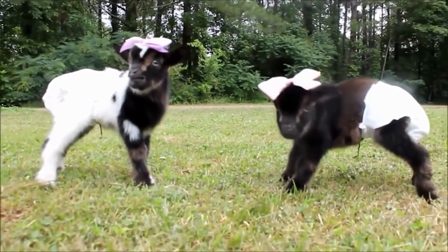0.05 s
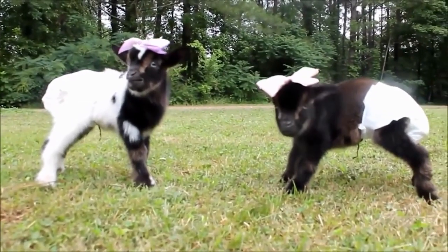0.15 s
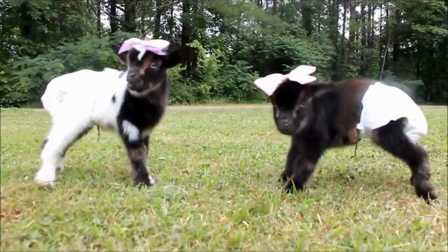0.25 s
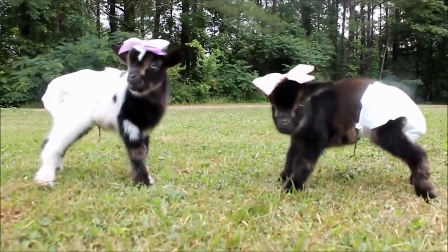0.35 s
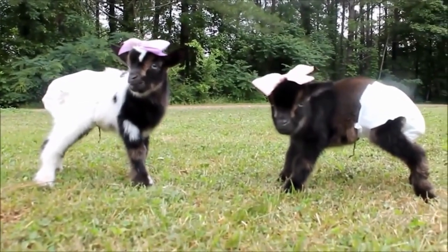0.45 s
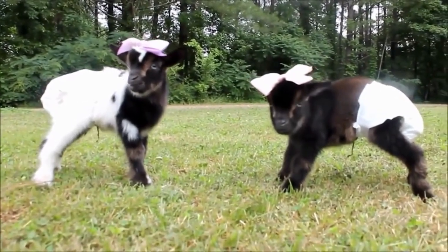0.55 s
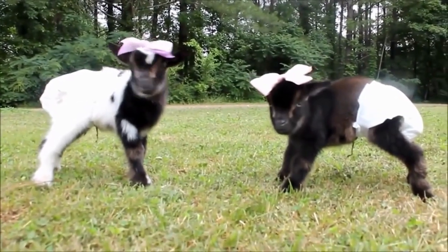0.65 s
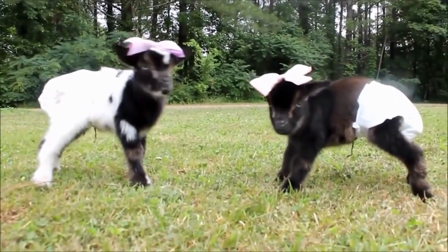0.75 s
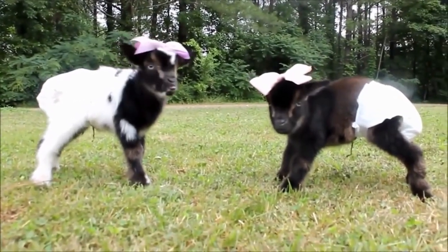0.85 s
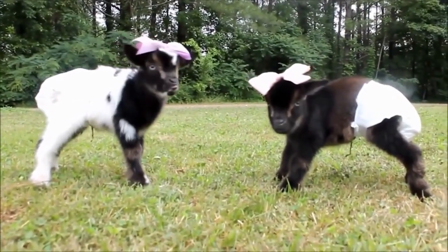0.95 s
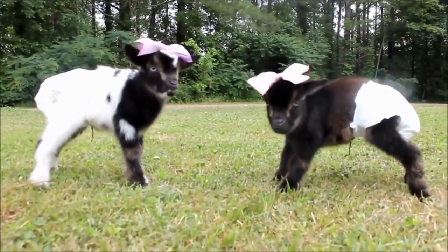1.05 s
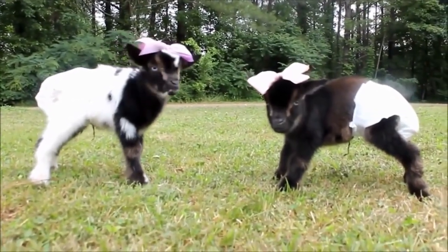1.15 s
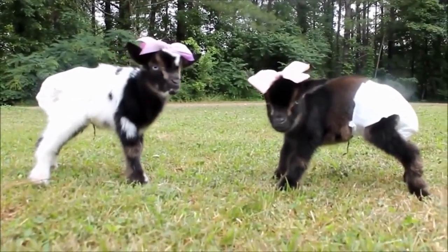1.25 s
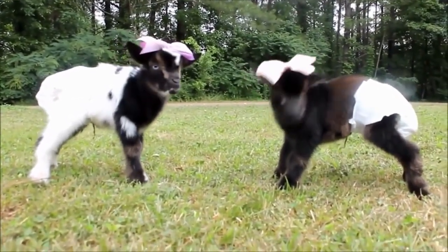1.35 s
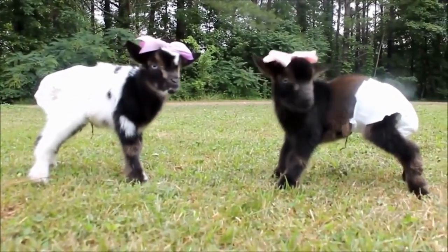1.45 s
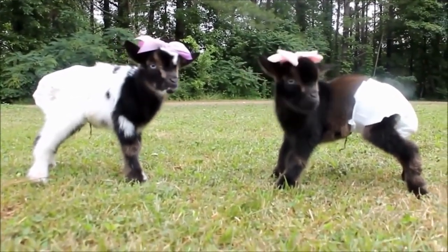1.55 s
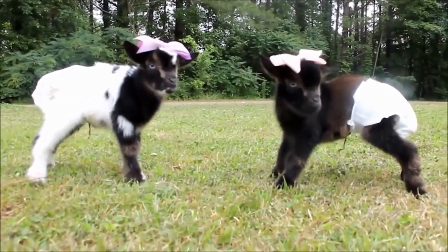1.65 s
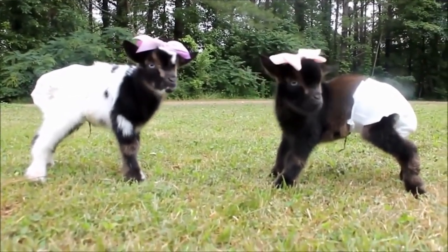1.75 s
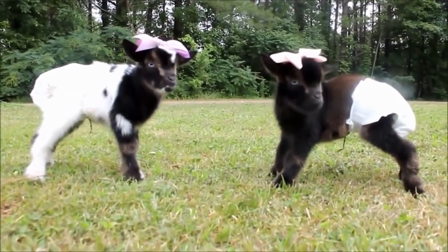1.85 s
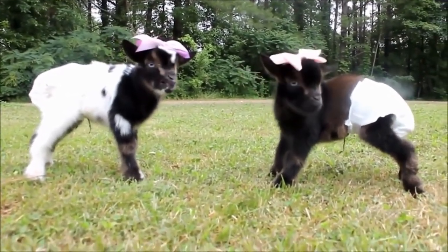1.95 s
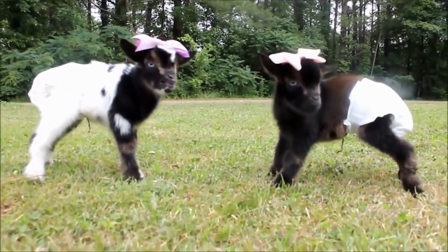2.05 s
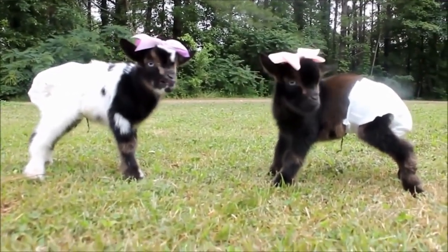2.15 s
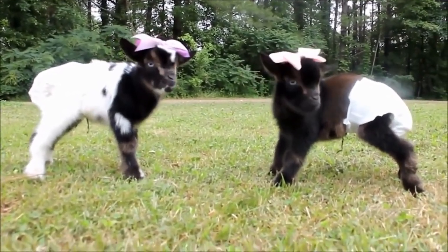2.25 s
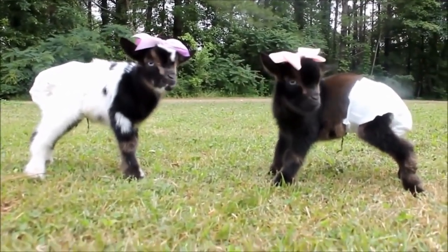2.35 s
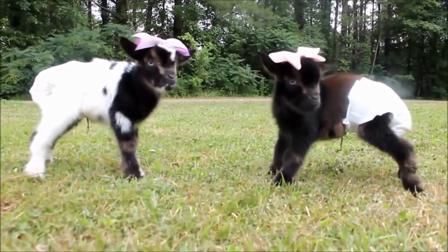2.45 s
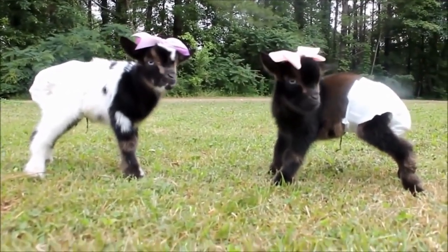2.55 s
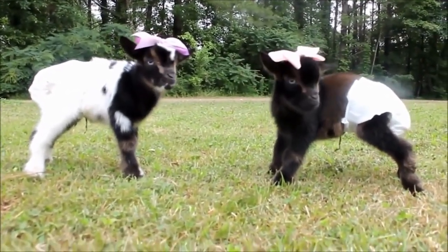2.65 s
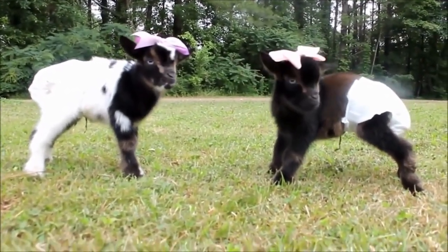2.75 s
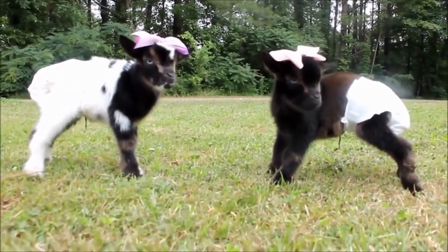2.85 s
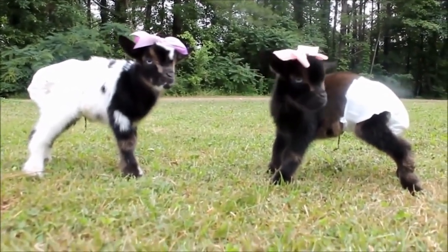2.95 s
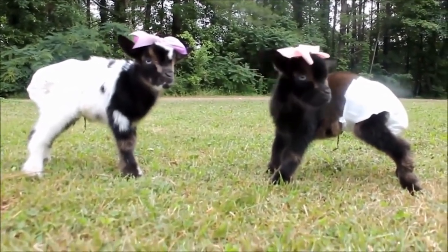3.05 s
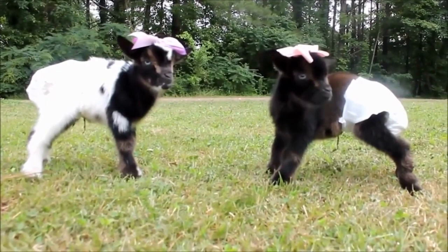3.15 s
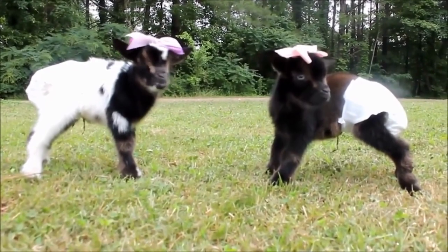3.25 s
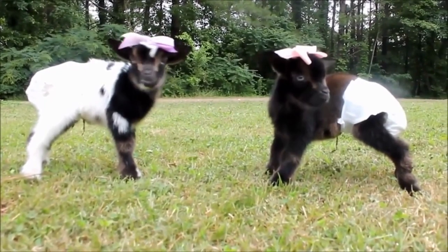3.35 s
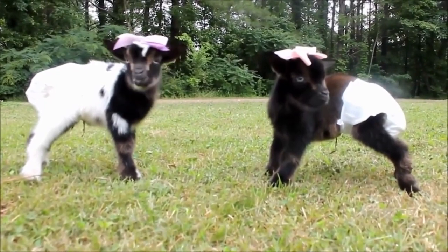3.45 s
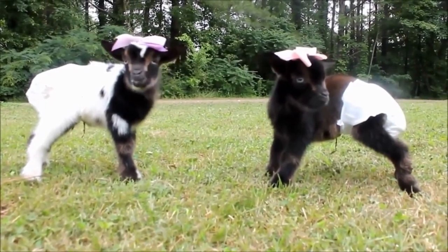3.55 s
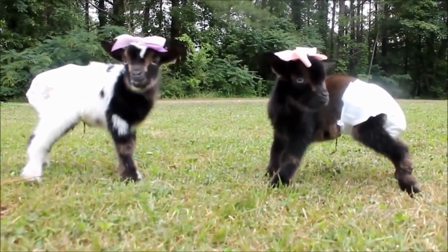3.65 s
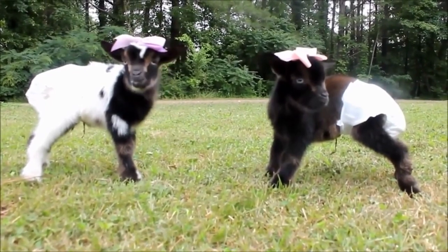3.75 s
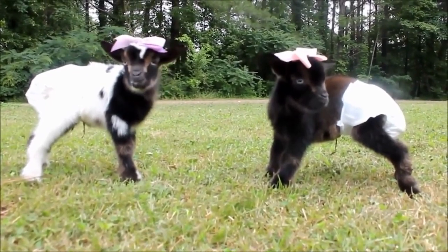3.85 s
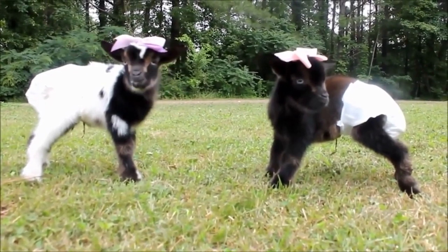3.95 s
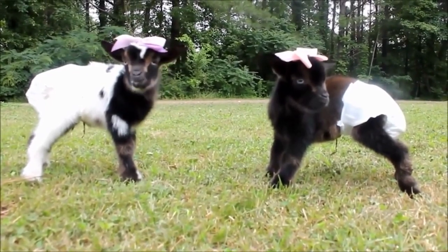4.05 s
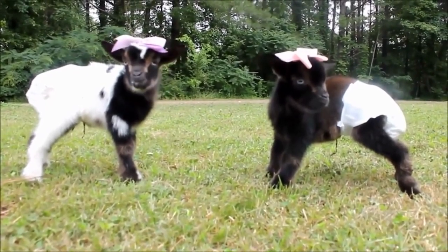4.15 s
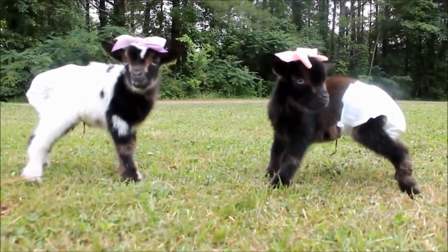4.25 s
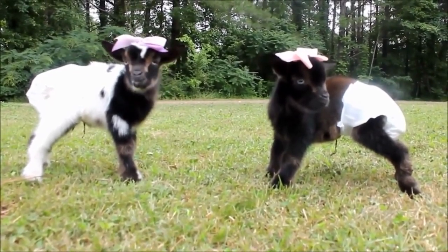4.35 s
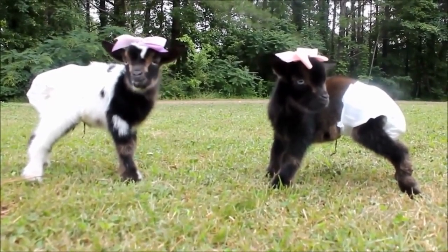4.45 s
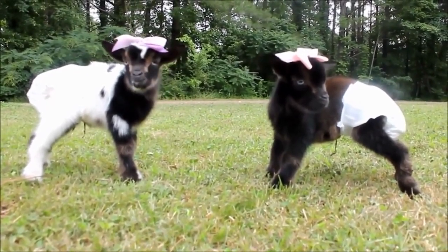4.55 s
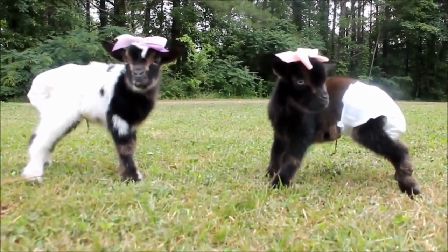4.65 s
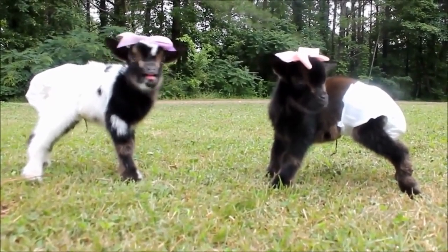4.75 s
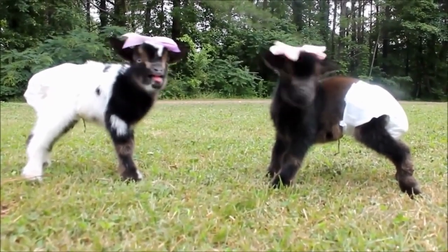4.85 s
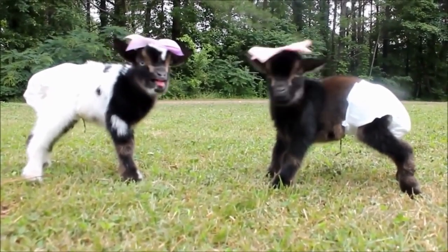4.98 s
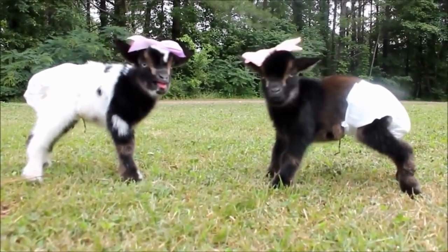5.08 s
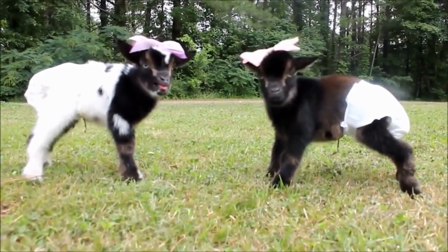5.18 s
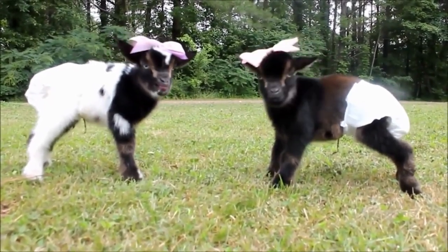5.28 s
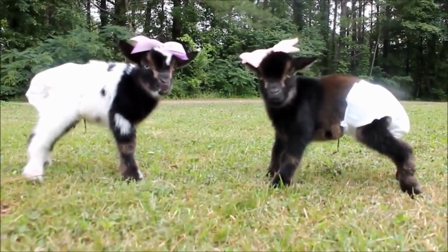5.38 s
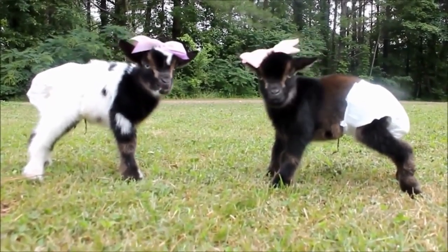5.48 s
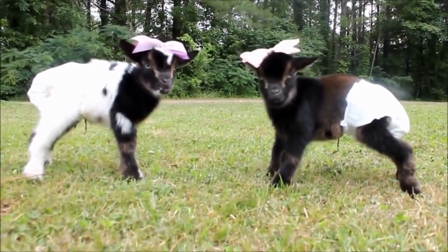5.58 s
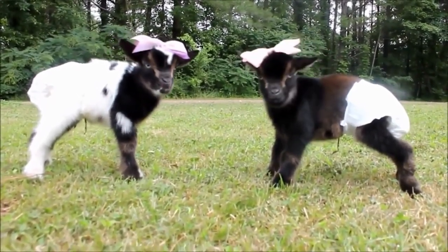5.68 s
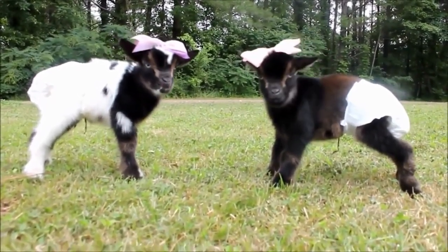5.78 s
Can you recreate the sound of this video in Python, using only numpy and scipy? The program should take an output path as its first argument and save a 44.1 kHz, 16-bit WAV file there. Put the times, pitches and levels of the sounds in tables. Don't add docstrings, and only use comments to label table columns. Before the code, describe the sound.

A goat kid near the microphone opens with a thin whimper and a short high bleat. After a quiet gap it mutters in closed-mouth throbs that burst into a second bleat. Faint birds twitter and grass ticks during a longer pause, then a louder, quavering cry of over half a second ends in a thin rising whine. Soft traffic hum and leaves continue on an open lawn edged by trees.

```python
import sys
import numpy as np
from scipy import signal
from scipy.fft import rfft, irfft, next_fast_len
from scipy.io import wavfile
from scipy.ndimage import uniform_filter1d

SR = 44100
rng = np.random.default_rng(int(sys.argv[2]) if len(sys.argv) > 2 else 0)


def to_linear_factor(level_db):
    exponent = np.asarray(level_db, float) / 20
    return 10 ** exponent


def transcribe(signal):
    frames = np.atleast_2d(signal).T
    limited = np.clip(frames, -1, 1)
    pcm = np.round(limited * 32767).astype(np.int16)
    wavfile.write(sys.argv[1], SR, pcm)


N = 256651

# [f/Hz, level/dB]
AIR = [(24, -63.5), (40, -42), (70, -20), (113, -5), (156, -9), (216, 0), (285, -4.5), (385, -13.5),
       (520, -8), (864, -8.5), (1110, -11.5), (1730, -14), (10000, -38.5), (13000, -61), (22000, -120)]
# [t/s, hum and leaves level/dB]
BREEZE = [
    (0, -58.5),
    (.6, -59.5),
    (1.4, -58),
    (2.4, -57.5),
    (3.001, -58.5),
    (3.5, -56.5),
    (4.7, -56.5),
    (5.4, -53.5),
    (5.82, -57),
]
CALM_DB = -58
RUSTLE_DB, RUSTLE_PER_DB = 3.5, -.5
TRAFFIC_DB, TRAFFIC_PER_DB = -0.22, -1.1

# [t/s, effort level/dB, pitch f/Hz, mouth opening 0-1]
WHIMPERS = [
    [(0, -63.5, 880, 0.81), (.034, -66.5, 903, 0.4), (.054, -67.5, 935, 0.64), (.08, -72, 928, 0.3),
     (.097, -62, 880, 0.4)],
    [(1.962, -59, 909, 0.13), (1.982, -55.5, 801, 0.12), (1.997, -49, 775.5, 0.48),
     (2.017, -49.5, 830, 0.46), (2.062, -64, 838, 0.2)],
]
FIRST = [
    (.094, -52.5, 877.2, 0),
    (.116, -43, 840, 0.44),
    (.131, -35.5, 853, 0.83),
    (.152, -39.5, 825, 0.85),
    (.19, -44, 821, 0.65),
    (.203, -33.5, 872, 0.85),
    (.24, -25.5, 840, 0.79),
    (.29, -37, 727, 0.86),
    (.312, -49, 880, 0.5),
]
SECOND = [
    (2.059, -51.5, 853, 0.16),
    (2.077, -36, 878, 1),
    (2.092, -29.5, 880, 0.99),
    (2.122, -32, 847.3, 0.85),
    (2.19, -30, 892, 0.93),
    (2.234, -29.5, 845, 0.924),
    (2.252, -34.5, 810, 0.68),
    (2.28, -43.5, 773, 0.66),
    (2.31, -43, 724, 0.77),
]
LONG = [
    (4.791, -53, 813, 0.31),
    (4.806, -28, 843.5, 0.77),
    (4.875, -33.5, 936, 0.93),
    (5.035, -34, 973, 0.57),
    (5.19, -26.5, 870.6, 0.61),
    (5.31, -23, 846.6, 0.658),
    (5.355, -27.5, 837.4, 0.72),
    (5.406, -27.5, 755, 0.813),
    (5.427, -63, 847, 1),
]
# [peak t/s, effort level/dB, pitch f/Hz, length ratio, share of the glide]
MUTTER = [
    (1.535, -42.5, 625, 0.9, 0.31),
    (1.621, -34, 660, 0.9, 0.94),
    (1.72, -36, 655, 1.01, .9),
    (1.818, -38, 660, 1, 1),
]
# [t/s from its peak, effort level/dB, pitch ratio]
THROB = [
    (-.043, -24.5, 0.83),
    (-.029, -14, 1.11),
    (-.02, -10.5, 1.09),
    (0, -2, 1),
    (0.013, -9.5, .98),
    (0.024, -14, .94),
    (.036, -17.5, .83),
]
# [t/s, effort level/dB, pitch f/Hz, mouth opening 0-1]
DRAWL = [
    (1.863, -55, 658, 0.133),
    (1.885, -54, 656, 0.12),
    (1.905, -59, 688, 0.1),
    (1.931, -51, 743, 0.068),
    (1.971, -53.5, 697, 0.094),
]
MUTTER_MOUTH = 0.17

# [level/dB, dB per dB of effort, dB per s of calling, dB per 100 Hz above mean pitch]
COLOUR_WHIMPERS = [
    [(3.5, -0.35, 20, -9), (1, -0.16, 62.5, 7), (-32.5, -0.54, -90, -4.5)],
    [(9, 0.079, 19.5, -5.5), (-7.5, -0.062, 152, -6.5), (-32.5, -.6, -18, -5)],
]
COLOUR_FIRST = [
    (4.5, 0.2, -73, 5),
    (0.5, 0.3542, -25, 2.5),
    (-41.5, 0.5, 88.5, 6),
]
COLOUR_MUTTER = [
    (-2.5, 0.22, 6.5, -2.2),
    (-11.5, -0.18, -15.5, 1.9),
    (-27.5, -0.45, -17, -2),
]
COLOUR_SECOND = [
    (-0.5, 0.32, -43.5, 10.7),
    (-2, 0.34, -15, 3.53),
    (-33.5, -0.13, 12.5, 1),
]
COLOUR_LONG = [
    (-2, 0.51, -34.5, 0.42),
    (3, -0.17, -1.5, 7.5),
    (-21, -.2, -11, 3.84),
]
MID_EFFORT_DB = -35
# [chest level/dB, brightness level/dB, sheen level/dB]
OPENING_DB = (-8, 0.5, -0.5)
EDGES_HZ = (1900, 4200, 10200, 13000)
TOP_FADE_START_S, TOP_FADE_DB_PER_S = 0.34, 95

# [t/s, fall t/s, recovery t/s, pitch drop f/Hz (negative lifts),
# effort change level/dB]
QUAVER = [(0.119, 0.0093, 0.012, 31.5, 3.5), (0.165, 0.0063, 0.011, 59.5, -1), (0.22, 0.006, 0.005, 2.1, 3),
          (0.227, 0.0059, 0.023, 52.5, 0.5), (0.301, .006, .006, 13, -3), (2.097, 0.00644, 0.02, 48.5, 1.5),
          (2.158, 0.019, 0.018, 61, -9), (2.209, 0.016, 0.016, 54.5, 5), (2.293, 0.0063, 0.0086, 55, 2),
          (4.902, 0.012, 0.021, 70, 6), (4.978, 0.01, 0.028, 69, 7.5), (5.002, 0.0132, 0.015, 45.5, 2),
          (5.102, 0.05, 0.026, 51, 2), (5.172, 0.0041, 0.017, 24.5, 2), (5.203, 0.0083, 0.0048, 26, -1),
          (5.258, 0.041, 0.038, 72, -2.5), (5.331, 0.0058, 0.018, 37, 0), (5.379, 0.017, 0.019, 61, -1.5),
          (.182, 0.0064, 0.0057, 12, -1), (2.035, 0.0092, 0.00833, 19, -4.5),
          (2.127, 0.0081, .01, -17.5, -2), (4.884, 0.014, 0.00574, -13, 3),
          (5.007, 0.0035, 0.00357, -0.5, -2.5), (5.226, 0.0075, 0.011, -22.5, -1),
          (1.511, .01, 0.01, 1.5, -10), (1.549, .014, .012, -0.5, 4.5), (5.091, 0.0041, 0.0046, 16.5, 2),
          (5.241, 0.0058, .006, -10.5, 2.5), (5.4, 0.0051, 0.0053, -20, -1.5)]
# [t/s, half width t/s, added breathiness 0-1]
RASP = [(.04, .06, .08), (.2, .12, .045), (1.68, .25, .062), (2.17, .14, .03), (5.28, .16, .013),
        (.175, .018, .18), (.31, .017, .45), (1.51, .01, .5), (1.545, .022, .08), (1.577, .012, .5),
        (1.67, .016, .7), (1.772, .02, .7), (1.852, .014, .22), (1.89, .05, .08), (2.159, .008, .2),
        (2.305, .022, .26), (4.788, .008, .12), (5.148, .022, .055), (5.21, .006, .05), (5.262, .012, .045),
        (5.29, .011, .06), (5.385, .016, .07), (5.432, .014, .55)]
CLEAR_BREATH = .022
# [t/s, phase wander/rad at 8.5 kHz]
FRAY = [(0, 1.2), (.07, .8), (.1, .2), (.14, .1), (.175, .5), (.2, .12), (.26, .15), (.295, .7), (1.5, 1.5),
        (1.56, 1.2), (1.6, .3), (1.83, .3), (1.86, 4), (1.915, 3), (1.95, 1), (2.0, .25), (2.13, .12),
        (2.16, .5), (2.19, .1), (2.24, .2), (2.28, .8), (4.8, .05), (4.99, .05), (5.02, .16), (5.05, .05),
        (5.11, .1), (5.145, .28), (5.18, .2), (5.23, .3), (5.27, .45), (5.31, .22), (5.35, .28), (5.39, .5)]

# [f/Hz, width f/Hz, level/dB]
SHUT = [(653, 350, -0.5), (1250, 760, -18.5), (2090, 750, 3), (2870, 420, -17), (4850, 1620, -14.5),
        (6766, 1400, -15), (8750, 1010, -13.5), (11800, 1500, -24)]
OPEN = [(880, 38, -32), (1830, 570, -2.5), (2500, 460, 5), (3500, 1800, -9.5), (5146, 930, 14),
        (7280, 1100, -2), (8600, 1140, -7.5), (10670, 4700, -20.5)]
POCKET_HZ, POCKET_SLIDE_HZ = 4980, 1384
# [t/s, f/Hz, depth 0-1]
TONGUE = [(0, 5700, 0.55), (.11, 4200, 0.33), (.135, 5300, 1), (.17, 5400, 1), (.2, 4500, 0.8),
          (.225, 3250, 0.87), (.3, 3100, 0.34), (1.97, 4000, 0), (2.075, 3900, 0.8), (2.093, 4130, 1),
          (2.105, 4670, 1), (2.125, 5400, 0.4), (2.2, 3430, 0.6), (2.3, 4060, 0.8), (4.8, 5500, 1),
          (5.1, 6100, 0.03), (5.3, 3600, 0.45), (5.43, 4020, 0.7)]
# [t/s, nose f/Hz, nose level/dB, chest level/dB]
NOSE = [(.09, 3500, 9, -4.5), (.122, 3300, -12, 2.5), (.146, 3400, 10.5, 1), (.17, 3140, -9, -2),
        (.212, 3450, 10, -0.5), (.247, 3230, -11, 0), (.28, 3000, -1, -2.5), (.305, 3300, 2, 12),
        (1.5, 3300, -1, -1), (1.845, 2900, 0.5, -2), (1.88, 2900, -11, -9), (1.925, 3000, -3, 3),
        (1.96, 3330, 1.5, -1), (1.985, 3200, 13, 1.5), (2.03, 3370, -6.5, -1.5), (2.078, 3500, -18, -3.5),
        (2.102, 3350, 8, 3), (2.14, 3350, -4, -4.5), (2.195, 3400, 4, 0), (2.215, 3330, -2, -3),
        (2.265, 3150, 6, 1.5), (2.295, 2800, -1, 10), (4.8, 3400, 2.5, 4), (4.82, 3500, 5, 4),
        (4.901, 3500, -4, -4), (4.98, 3570, -4, -5), (5.098, 3500, -5, -0.5), (5.18, 3300, -9.5, 2),
        (5.26, 3190, -3, -4.5), (5.33, 3400, -7, 3), (5.385, 2950, -1, -4.5), (5.41, 3100, 4, 11)]
# [t/s, f/Hz, level/dB]
CHEEK = [(0, 5300, -14), (.03, 5600, -3), (.09, 6100, -11), (.15, 5900, -11), (.165, 5700, -2.5),
         (2.01, 5460, 3.5), (2.045, 5390, -8), (2.07, 6100, -5), (2.095, 4180, -2), (2.12, 4300, 1),
         (2.2, 5950, 0.5), (2.3, 5000, -2), (4.85, 9900, -5), (5.05, 9650, -8), (5.078, 6300, 2),
         (5.098, 6100, -19), (5.165, 6200, -7), (5.19, 6500, -10), (5.262, 6450, -10), (5.275, 4080, -14),
         (5.29, 4050, -5), (5.34, 4020, -7), (5.365, 6500, -6), (5.41, 3970, -3)]
# [t/s, f/Hz, lift level/dB]
PALATE = [(0, 4500, 7), (.03, 4580, -4.5), (.065, 8500, -8), (.105, 5100, 12), (.122, 7860, -5),
          (.14, 8700, 9), (.17, 8100, 5), (.205, 6900, 0), (.24, 7600, 0), (.27, 8600, 0), (1.53, 7200, 6),
          (1.6, 7440, 13), (1.63, 9500, -18), (1.7, 8710, -9), (1.81, 8650, -2), (1.94, 8860, -27),
          (2.0, 7520, 5), (2.08, 7130, 8), (2.105, 7400, 2.5), (2.16, 7300, 1.5), (2.19, 7000, 2),
          (2.215, 7660, 2), (2.26, 5970, -14), (4.8, 8350, -8), (4.9, 7200, -1), (5.0, 8450, -16),
          (5.1, 8370, 2), (5.169, 9300, -12), (5.3, 8700, -7.5), (5.4, 5620, -41)]
TONGUE_WIDTH_HZ, NOSE_WIDTH_HZ, CHEEK_WIDTH_HZ, PALATE_WIDTH_HZ = 3540, 800, 1500, 1370

# [t/s, length t/s, middle f/Hz, slide as share of pitch, level/dB]
SLIDES = [(.502, 0.044, 3660, -0.01, -68.5), (2.556, 0.087, 9100, -0.012, -74.5),
          (2.573, 0.032, 3040, .05, -68), (2.621, 0.033, 3730, -0.2, -59.5),
          (2.813, 0.0155, 3500, -0.069, -63.5), (2.966, 0.026, 4080, -0.034, -59.5),
          (2.989, 0.017, 7050, -0.0069, -63.5), (3.001, 0.028, 6350, -0.018, -59),
          (3.11, 0.035, 2670, -.14, -69), (3.045, 0.0143, 4640, .05, -69), (3.056, .015, 3355, -0.022, -64),
          (3.387, 0.037, 4390, -.03, -65), (3.533, .025, 5040, 0.036, -66), (4.36, 0.04, 5910, 0.018, -60),
          (3.432, 0.033, 3414, 0.036, -64), (3.455, 0.0223, 3870, 0.055, -63),
          (3.494, 0.11, 3100, -0.152, -67.5), (3.572, 0.11, 2500, -0.066, -65.5),
          (3.538, 0.031, 4620, -0.065, -64), (3.615, 0.037, 4580, -0.049, -63),
          (3.757, 0.0603, 2500, 0.04, -66.5), (4.431, 0.01, 7080, -0.11, -67),
          (4.439, 0.017, 6094, -.1, -55), (4.542, 0.011, 5700, -0.07, -64),
          (4.546, 0.053, 3418, -0.15, -62), (4.593, 0.032, 3300, .1, -62),
          (4.481, 0.015, 4600, 0.01, -58.5), (.33, 0.072, 3717, -0.037, -67.5), (.4, .11, 3710, 0.015, -78),
          (.29, 0.15, 7250, -0.011, -81), (3.24, 0.52, 4489, 0.012, -76), (3.8, 0.75, 2716, 0.017, -79)]
# [t/s, peak level/dB, length t/s]
GASPS = [
    (.307, -41, .036),
    (2.302, -45, .04),
    (5.416, -42.5, .04),
]
GASP_RINGS_HZ = (2650, 3600, 5400)
# [t/s, peak level/dB, ring f/Hz]
TICKS = [
    (1.1034, -35, 7400),
    (3.14, -35, 7920),
    (3.363, -40, 5920),
    (3.5684, -31, 5200),
    (3.6404, -32, 5000),
    (3.6474, -31.5, 5600),
    (3.7337, -36, 5200),
    (4.4466, -40, 7000),
]
# [t/s, length t/s, top f/Hz, level/dB]
ARCHES = [
    (2.665, .069, 8350, -72),
    (2.767, .066, 8050, -70.5),
    (2.878, .037, 7700, -70.5),
]
ARCH_DEPTH, ARCH_SQUARE = .33, 5
# [t/s, centre f/Hz, level/dB]
TRILL = [
    (3.201, 4530, -76),
    (3.26, 4470, -66),
    (3.45, 4215, -71.5),
    (3.65, 4500, -65),
    (3.85, 4450, -79),
]
TWITTER = [
    (4.681, 3500, -71),
    (4.699, 3500, -61),
    (4.734, 3600, -64),
    (4.791, 4000, -61),
]
# [t/s, centre f/Hz, level/dB]
AFTERGLOW = [
    (5.595, 2050, -74),
    (5.63, 1970, -59.5),
    (5.69, 1990, -74),
    (5.73, 2050, -74),
]
SMACK_S, SMACK_DB, SMACK_HZ, SMACK_FADE_S = 4.794, -50, 1050, .005
# [t/s, pitch f/Hz, level/dB]
WHINE = [
    (5.455, 1730, -61),
    (5.493, 1830, -54.5),
    (5.517, 1890, -57.5),
    (5.555, 1973, -48.5),
    (5.587, 2112, -52),
    (5.61, 2163, -87),
]
# [f/Hz, level/dB]
SELF_NOISE = [(20, -118), (60, -110), (150, -118), (7000, -116), (11500, -104), (16000, -103)]


def read(points, hz):
    f, value = np.transpose(points)
    return np.interp(np.log(hz + 1), np.log(f + 1), value)


def follow(t, rows):
    s, *columns = np.transpose(rows)
    return [np.interp(t, s, column) for column in columns]


def evened(x):
    return x / np.sqrt(np.mean(x ** 2) + 1e-20)


def wander(shape, size):
    return evened(uniform_filter1d(uniform_filter1d(rng.standard_normal(shape), size), size))


def bumps(t, s, rise, fall, *heights):
    lag = t - s[:, None]
    span = np.where(lag < 0, rise[:, None], fall[:, None])
    return np.array(heights) @ np.exp(-(lag / span) ** 2)


def whistle(hz):
    return np.sqrt(2) * np.sin(2 * np.pi * np.cumsum(hz) / SR)


def resonate(x, hz, width):
    turn = np.exp(2j * np.pi * np.cumsum(hz * np.ones(len(x))) / SR)
    r = np.exp(-np.pi * width / SR)
    return 2 * (turn * signal.lfilter([(1 - r) ** 2], [1, -2 * r, r * r], x / turn)).real


def shaped(db):
    a, b = rng.standard_normal((db.shape[1], db.shape[0], 2)).T
    return signal.istft((a + 1j * b) * to_linear_factor(db), nperseg=1024, noverlap=768)[1][:N]


def add(mix, s, sound):
    part = mix[round(s * SR):][:len(sound)]
    part += sound[:len(part)]


def background():
    frames, hz = N // 256 + 5, np.fft.rfftfreq(1024, 1 / SR)
    patches = rng.standard_normal((frames, 513)).T
    patches = uniform_filter1d(uniform_filter1d(patches, size=10, axis=0), size=14, axis=1)
    patch_db = (1.1 + .6 * np.clip(hz / 2000, 0, 1))[:, None] * evened(patches)
    level_db, = follow(np.arange(frames) * 256 / SR, BREEZE)
    rustle_db = RUSTLE_DB + RUSTLE_PER_DB * (level_db - CALM_DB)
    traffic_db = TRAFFIC_DB + TRAFFIC_PER_DB * (level_db - CALM_DB)
    treble = np.clip(np.log2(hz / 1500 + 1e-9), 0, 1) / (1 + (hz / 8200) ** 6)
    lift_db = np.outer(treble, rustle_db) + np.outer(hz < 320, traffic_db)
    wash = evened(shaped(read(AIR, hz)[:, None] + patch_db + lift_db))
    return wash * to_linear_factor(np.interp(np.arange(N) / 256, np.arange(frames), level_db))


def controls(t, rows, colour):
    glide = round(.009 * SR)
    effort_db, hz, mouth = (uniform_filter1d(c, glide, mode="nearest") for c in follow(t, rows))
    drop_hz, lift_db = bumps(t, *np.transpose(QUAVER))
    effort_db, hz = effort_db + lift_db, hz - drop_hz
    mouth = np.clip(mouth, 0, 1)
    causes = np.array([1 + 0 * t, effort_db - MID_EFFORT_DB, t - t[0], (hz - hz.mean()) / 100])
    colour_db = np.array(colour) @ causes + np.outer(OPENING_DB, mouth - .5)
    return effort_db, hz, mouth, *colour_db


def vocal_folds(t, hz, turns, breath, flutter_db):
    k = np.arange(1, 24)[:, None]
    flutter = to_linear_factor(flutter_db * np.minimum(k, 12) * wander((len(k), len(t)), size=450))
    fray = follow(t, FRAY)[0] * (k * hz / 8500) ** 2.6 * wander((len(k), len(t)), size=50)
    overtones = flutter * np.cos(2 * np.pi * k * turns + fray)
    folds = (overtones * (k * hz < 17000)).sum(0)
    return folds * (1 + 1.2 * np.minimum(breath, .3) * wander(len(t), size=110))


def puffed_air(turns, breath):
    puffs = evened((.25 + np.exp(-(turns % 1) / .3)) * rng.standard_normal(len(turns)))
    rasp = np.clip(26 * breath, .7, 1.5) * resonate(puffs, 5400, 2400)
    rasp = rasp + 1.5 * breath * puffs * (breath > .15)
    rasp = rasp + .6 * resonate(puffs, 3000, 2000) + .3 * resonate(puffs, 7000, 1200)
    return rasp, .6 * resonate(puffs, 13500, 3600)


def throat(drive, mouth):
    out = np.zeros(len(drive))
    for i, (shut, wide) in enumerate(zip(SHUT, OPEN)):
        hz, db = (shut[j] + mouth * (wide[j] - shut[j]) for j in (0, 2))
        width = shut[1] + np.mean(mouth) * (wide[1] - shut[1])
        out += (-1) ** i * to_linear_factor(db) * resonate(drive, hz, max(width, 50))
    return out - 0.42 * resonate(out, POCKET_HZ + POCKET_SLIDE_HZ * mouth, 638.4)


def registers(x):
    size = next_fast_len(len(x) + 2048)
    hz = np.fft.rfftfreq(size, 1 / SR)
    below = [0 * hz] + [1 / (1 + (hz / edge) ** 40) for edge in EDGES_HZ] + [1 + 0 * hz]
    parts = irfft(np.diff(below, axis=0) * rfft(x, size), size)[:, :len(x)]
    return parts / np.sqrt(uniform_filter1d(parts ** 2, size=700, axis=1) + 1e-12)


def bleat(rows, colour, catch=0, flutter_db=.33, dull_db=0):
    start_s, end_s = rows[0][0], rows[-1][0]
    t = np.arange(start_s, end_s, 1 / SR)
    effort_db, hz, mouth, chest_db, bright_db, sheen_db = controls(t, rows, colour)
    rough_s, width, rough = np.transpose(RASP)
    breath = np.minimum(CLEAR_BREATH + bumps(t, rough_s, width, width, rough)[0], 1)
    hz = hz * (1 + catch * np.exp(-((t - start_s) / 0.0054) ** 3))
    jitter = .07 * np.minimum(breath, .3) * wander(len(t), size=40)
    unsteady = jitter + .0035 * wander(len(t), size=300)
    turns = np.cumsum(hz * (1 + unsteady)) / SR
    folds = vocal_folds(t, hz, turns, breath, flutter_db)
    rasp, fizz = puffed_air(turns, breath)
    voice = throat((1 - breath) * evened(folds) + breath * rasp + fizz, mouth)

    dip_hz, depth = follow(t, TONGUE)
    voice = voice - depth.clip(0, 1) * resonate(voice, dip_hz, TONGUE_WIDTH_HZ)
    top_fade_db = TOP_FADE_DB_PER_S * np.maximum(t - start_s - TOP_FADE_START_S, 0)
    top_db = 1.8 * sheen_db + 11.5 - dull_db - top_fade_db
    nose_hz, nose_db, nose_chest_db = follow(t, NOSE)
    parts_db = [chest_db + nose_chest_db, 0 * t, bright_db, sheen_db - .2 * top_fade_db, top_db]
    voice = to_linear_factor(effort_db) * (to_linear_factor(np.array(parts_db)) * registers(voice)).sum(0)

    voice = voice + (to_linear_factor(nose_db) - 1) * resonate(voice, nose_hz, NOSE_WIDTH_HZ)
    cheek_hz, cheek_db = follow(t, CHEEK)
    voice = voice + (to_linear_factor(cheek_db) - 1) * resonate(voice, cheek_hz, CHEEK_WIDTH_HZ)
    palate_hz, lift_db = follow(t, PALATE)
    voice = voice + to_linear_factor(lift_db) * resonate(voice, palate_hz, PALATE_WIDTH_HZ)
    return start_s, voice * signal.windows.tukey(len(t), 500 / len(t))


def chirp(s, length, middle_hz, slide, db):
    n = round(length * SR)
    bend = np.interp(np.linspace(0, 1, n), [0, .43, .57, 1], [1 - slide, 1, 1, 1 + slide])
    hz = middle_hz * uniform_filter1d(bend, n // 8, mode="nearest")
    hz = hz * (1 + min(.02, 32 / n) * wander(n, size=40))
    grain_db = 3.5 * wander(n, size=90)
    return s, to_linear_factor(db + grain_db) * whistle(hz) * signal.windows.tukey(n, .5)


def trees(x, t60, delay_s):
    t = np.arange(0, .6, 1 / SR)
    tail = rng.standard_normal(len(t)) * to_linear_factor(-60 * t / t60) * (t > delay_s)
    return signal.fftconvolve(x, tail / np.linalg.norm(tail))[:N]


def gasp(s, db, length):
    u = np.arange(0, 1, 1 / (1.55 * length * SR))
    parts = registers(throat(rng.standard_normal(len(u)), 1.0 + 0 * u))
    air = evened(to_linear_factor(np.array([-4.0, 2.5, 1.0, -17.5, -33])) @ parts)
    air = air + 1.1 * sum(resonate(air, hz, 450) for hz in GASP_RINGS_HZ)
    swell = np.e * 4.5 * u * np.exp(-4.5 * u) * (1 - u)
    return s, to_linear_factor(db + 2.4 * wander(len(u), size=120)) * evened(air) * swell


def tick(s, db, hz):
    t = np.arange(0, .012, 1 / SR)
    snap = rng.standard_normal(len(t)) * np.exp(-t / 0.002)
    return s, to_linear_factor(db - 18.5) * (resonate(snap, 5200, 5400) + 0.99 * resonate(snap, hz, 1200))


def mutter():
    course = [tuple(row) for row in DRAWL]
    for s, db, hz, stretch, glide in MUTTER:
        for lag, fall_db, ratio in THROB:
            course.append((s + lag * stretch, db + fall_db, hz * ratio ** glide, MUTTER_MOUTH))
    return sorted(course)


def arch(s, length, top_hz, db):
    u = np.linspace(-1, 1, round(length * SR))
    hz = top_hz * (1 - ARCH_DEPTH * abs(u) ** ARCH_SQUARE)
    hz = hz * (1 + .014 * wander(len(u), size=40))
    grain_db = 3.5 * wander(len(u), size=80)
    return s, to_linear_factor(db + grain_db) * whistle(hz) * signal.windows.tukey(len(u), .1)


def trill(rows):
    t = np.arange(rows[0][0], rows[-1][0], 1 / SR)
    hz, db = follow(t, rows)
    air = rng.standard_normal(len(t))
    blur = resonate(air, 1.013 * hz, 400) + 1.4 * resonate(air, 0.932 * hz, 760)
    return rows[0][0], to_linear_factor(db + 2.6 * wander(len(t), size=600)) * evened(blur)


def smack():
    t = np.arange(0, 6 * SMACK_FADE_S, 1 / SR)
    air = evened(resonate(rng.standard_normal(len(t)), SMACK_HZ, 858))
    return SMACK_S, to_linear_factor(SMACK_DB) * air * t / SMACK_FADE_S * np.exp(1 - t / SMACK_FADE_S)


def whine():
    t = np.arange(WHINE[0][0], WHINE[-1][0], 1 / SR)
    hz, db = follow(t, WHINE)
    tone = whistle(hz) + to_linear_factor(-27) * whistle(hz / 2)
    return WHINE[0][0], to_linear_factor(db) * tone * signal.windows.tukey(len(t), .1)


def scene():
    goat, birds, grass = np.zeros((3, N))
    for rows, colour in zip(WHIMPERS, COLOUR_WHIMPERS):
        add(goat, *bleat(rows, colour))
    add(goat, *bleat(FIRST, COLOUR_FIRST, flutter_db=.4, dull_db=8))
    add(goat, *bleat(mutter(), COLOUR_MUTTER, flutter_db=.4, dull_db=1.5))
    add(goat, *bleat(SECOND, COLOUR_SECOND, flutter_db=.4, dull_db=2.5))
    add(goat, *bleat(LONG, COLOUR_LONG, catch=0.15))
    for row in GASPS:
        add(goat, *gasp(*row))
    add(goat, *smack())
    add(goat, *whine())
    for row in SLIDES:
        add(birds, *chirp(*row))
    for row in ARCHES:
        add(birds, *arch(*row))
    for rows in (TRILL, TWITTER, AFTERGLOW):
        add(birds, *trill(rows))
    for row in TICKS:
        add(grass, *tick(*row))

    goat_echo = to_linear_factor(-29) * trees(goat, .06, .005)
    high_birds = birds - .6 * resonate(birds, 3500, 3000)
    bird_echo = to_linear_factor(-4) * trees(high_birds, .4, .012)
    power_db = 10 * np.log10(uniform_filter1d(goat ** 2, size=6000).clip(1e-9))
    dip_db = 1.7 * np.maximum(power_db + 27.5, 0)
    around = birds + bird_echo + grass + background()
    return (goat + goat_echo + around / to_linear_factor(uniform_filter1d(dip_db, size=3000)))[None]


def low_pass(x):
    return signal.sosfilt(signal.butter(12, 15760, fs=SR, output="sos"), x)


def record(dry):
    hz = np.fft.rfftfreq(1024, 1 / SR)
    own_noise = shaped(np.outer(read(SELF_NOISE, hz), np.ones(N // 256 + 5)))
    return low_pass(dry + own_noise)


dry = scene()
out = record(dry)
transcribe(out)
```